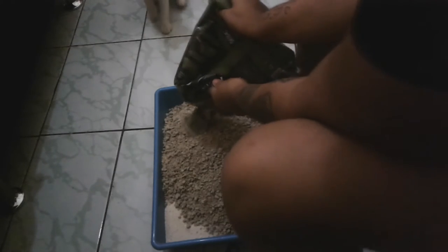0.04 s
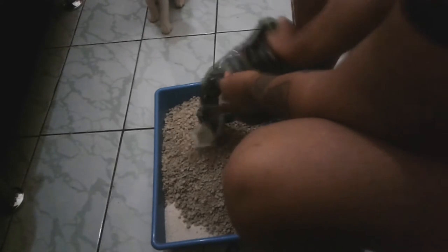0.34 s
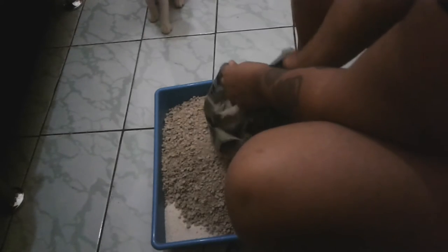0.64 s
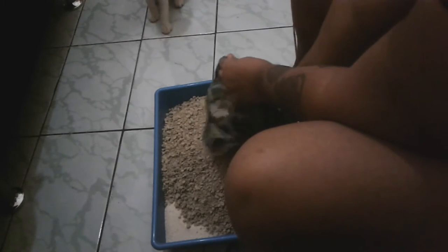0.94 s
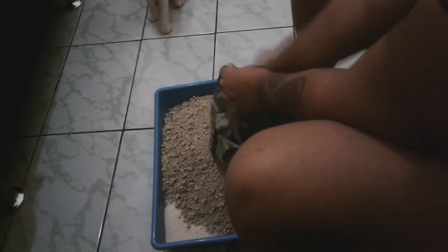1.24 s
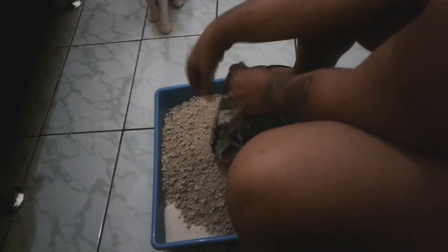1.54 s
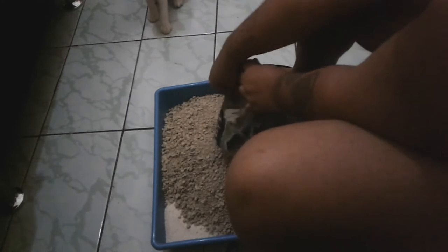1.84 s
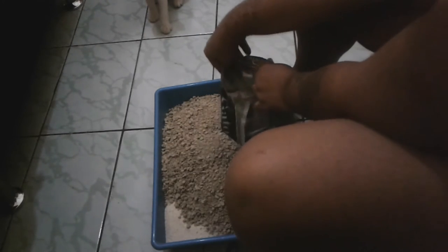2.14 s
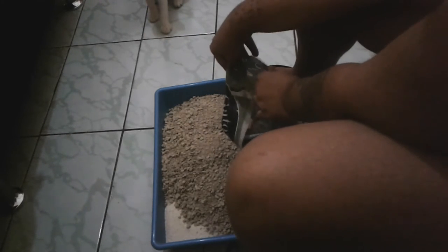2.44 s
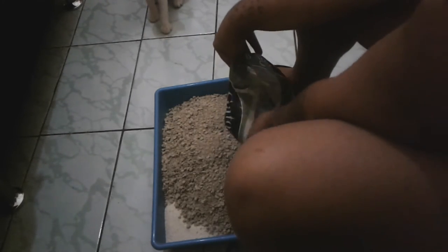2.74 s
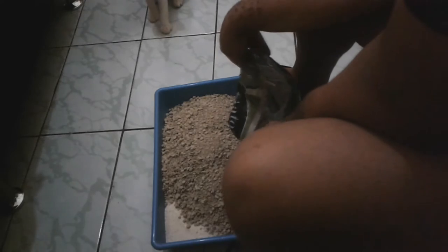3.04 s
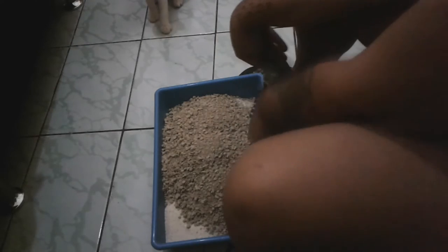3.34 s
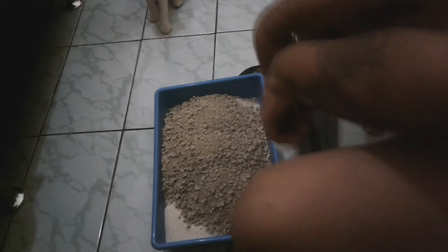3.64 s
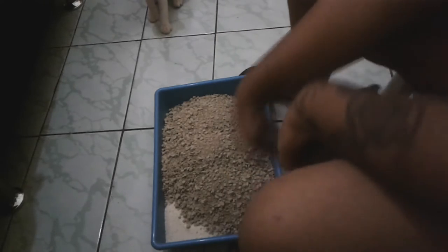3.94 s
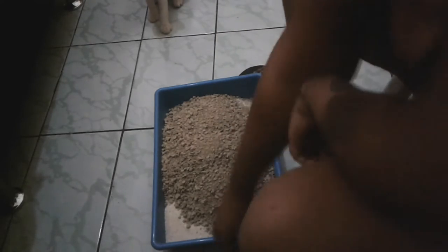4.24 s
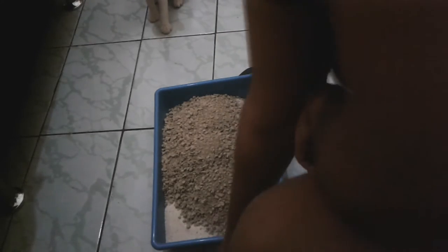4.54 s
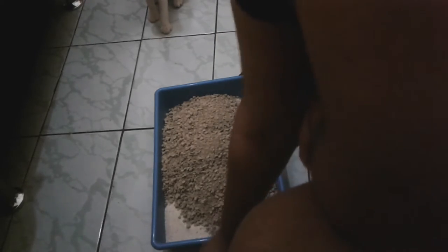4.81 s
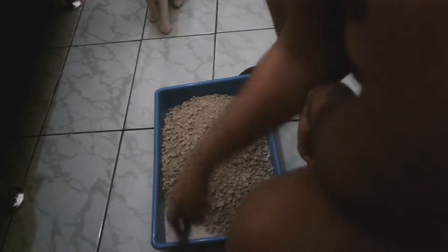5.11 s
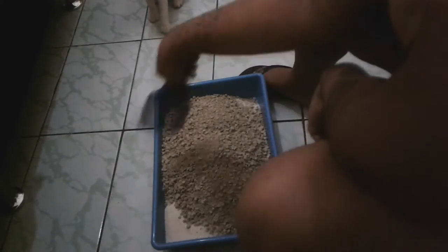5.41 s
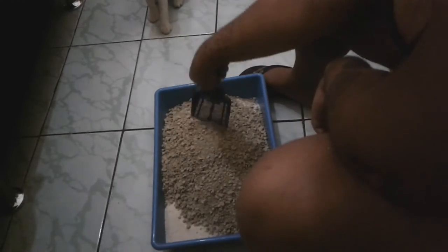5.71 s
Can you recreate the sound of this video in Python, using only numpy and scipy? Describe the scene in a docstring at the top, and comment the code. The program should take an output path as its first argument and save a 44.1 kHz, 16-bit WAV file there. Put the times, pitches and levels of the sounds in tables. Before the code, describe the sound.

Cat litter patters into a plastic tray as a crackling plastic bag is shaken empty, then a plastic scoop knocks and scrapes.

```python
"""A plastic bag is crumpled and shaken empty over a tray of cat litter in a small tiled room.
From the start a fan hums faintly and granules slide and patter onto the heap in countless impacts.
From 0.2 s to about 4 s the film rustles by friction and snaps as its folds buckle; the tray bumps softly.
The flow dies away, and from 4.8 s a plastic scoop is picked up, knocking and scraping over grit.
The tiles reverberate after every snap and knock."""
import sys
import numpy as np
from scipy import signal
from scipy.fft import rfft, irfft
from scipy.io import wavfile

SR = 44100
rng = np.random.default_rng(int(sys.argv[2]) if len(sys.argv) > 2 else 0)


def waveform_to_disk(signal):
    """Save audio, clipped to [-1, 1], as 16-bit WAV at the path in sys.argv[1]."""
    frames = np.transpose(np.atleast_2d(signal))
    scaled = np.clip(frames, -1, 1) * 32767
    samples = np.round(scaled).astype(np.int16)
    wavfile.write(sys.argv[1], SR, samples)


N = 258867
TIME = np.arange(N) / SR

# granules sliding out of the bag until it is empty: (time [s], flow level [dB])
LITTER_FLOW = [(0, -47.5), (.58, -44.5), (.74, -46), (.86, -40.5), (1.0, -44.5), (1.27, -49), (1.36, -46.5),
               (1.48, -43.5), (1.76, -61.5), (2.22, -46.5), (2.45, -52), (2.63, -53), (2.77, -61),
               (3.14, -61), (3.48, -38.5), (3.59, -44), (4.26, -49), (4.39, -60), (4.58, -60.5), (4.7, -62)]
EMPTY_S = LITTER_FLOW[-1][0]


def undb(db):
    """Amplitude ratio: a factor of ten for every 20 dB."""
    return 10 ** (np.asarray(db) / 20)


def unit(x):
    """Normalisation to an rms of 1."""
    return x / np.sqrt(np.mean(x ** 2))


def add(track, s, x):
    """Superposition of a short sound on a track at time s."""
    i = int(s * SR)
    track[i:i + len(x)] += x[:N - i]


def colour(x, spectrum):
    """Minimum-phase filtering to the given spectral shape; rms 1."""
    hz, db = np.transpose(spectrum)
    size = 2048
    f = np.maximum(np.fft.rfftfreq(size, 1 / SR), 1)
    magnitude = undb(np.interp(np.log(f), np.log(hz), db))
    cepstrum = irfft(np.log(magnitude))
    cepstrum[1:size // 2] *= 2  # folding the cepstrum makes the filter causal
    cepstrum[size // 2 + 1:] = 0
    response = irfft(np.exp(rfft(cepstrum)))
    return unit(signal.fftconvolve(x, response)[:len(x)])


def ring(x, hz, width_hz):
    """Resonance of one damped mode: the narrower the band, the longer it rings."""
    return signal.lfilter(*signal.iirpeak(hz, hz / min(width_hz, SR / 4), fs=SR), x)


def walk(rate):
    """Random modulation: rate Gaussian values a second, joined by straight lines."""
    knots = rng.standard_normal(1024)
    return np.interp(TIME * rate, np.arange(len(knots)), knots)


def grains(rate, spread_db):
    """Shot noise: independent impacts of random size, on average rate a second."""
    hit = rng.random(N) < rate / SR
    size = undb(spread_db * np.minimum(rng.exponential(size=N), 4.5))
    return hit * size * rng.choice([-1, 1], N)


def shower(rate, spread_db, wash_db):
    """Dense impacts over Gaussian noise, which stands for the diffuse field of their echoes; rms 1."""
    return unit(unit(grains(rate, spread_db)) + undb(wash_db) * rng.standard_normal(N))


def slips(ms, decay):
    """Stick-slip friction as a dying burst of whitened noise; energy 1."""
    t_ms = np.arange(SR // 20) * 1000 / SR
    fade = np.exp(-t_ms / (decay * max(ms, .2)))
    phase = np.angle(rfft(rng.standard_normal(len(t_ms)) * fade))
    burst = irfft(np.exp(1j * phase), len(t_ms)) * np.sqrt(fade)
    return burst / np.linalg.norm(burst)


def click(crisp_db, body_db, ms, modes, decay, thud_db):
    """Impulsive excitation of plastic: a crisp top, the ring of its modes and a faint dull thud."""
    # spectrum of the crisp top: (frequency [Hz], relative level [dB])
    crack_spectrum = [(1500, -20), (4000, -21), (6000, -9), (7600, -5.5), (8600, -1.5), (9500, 5),
                      (10400, -1.5), (11200, -6.5), (12300, -13)]
    push = slips(ms, decay)
    top = colour(slips(ms, decay), crack_spectrum)
    body = sum(undb(db) * ring(ring(push, hz, width_hz), hz, 3 * width_hz) for hz, width_hz, db in modes)
    thud = ring(ring(slips(ms, decay), 450, 1400), 450, 1400)
    parts = ((top, crisp_db), (body, body_db), (thud, body_db + thud_db))
    # each part has the energy of 1 ms of sound at its level
    return sum(part / np.linalg.norm(part) * undb(db) for part, db in parts) * np.sqrt(SR / 1000)


def strokes(table, attack_s, fade_db_per_s):
    """Envelope of hand strokes: each rises, holds and decays exponentially; their powers add."""
    power = np.zeros(N)
    for s, hold_s, db in table:
        attack = np.clip((TIME - s) / attack_s + .5, 0, 1)
        fade_db = fade_db_per_s * np.maximum(TIME - s - hold_s, 0)
        power += (attack * undb(db - fade_db)) ** 2
    return np.sqrt(power)


def motions():
    """Excitation envelopes of the flowing litter, the crumpling hands and the scraping scoop."""
    # hands crumpling the bag: (time [s], hold [s], level [dB])
    crumples = [(0.225, 0.2, -43.5), (0.465, 0.014, -38.5), (0.497, 0.065, -39.5), (0.772, 0.07, -37),
                (1.11, 0.018, -45.5), (2.058, 0.046, -40), (2.2, 0.017, -38.5), (2.812, .03, -49.5),
                (3.17, 0.024, -44), (3.295, 0.024, -43.5), (3.405, 0.071, -38.5), (3.61, 0.04, -39.5),
                (3.70, 0.0081, -56), (3.905, 0.091, -42.5)]
    # the scoop scraping over grit: (time [s], hold [s], level [dB])
    scrapes = [(4.955, 0.02, -52), (5.135, 0.08, -54.5), (5.3, 0.088, -59.5), (5.384, 0.019, -50.5),
               (5.51, 0.019, -60), (5.803, 0.089, -54)]
    flow_db = np.interp(TIME, *np.transpose(LITTER_FLOW))
    fade_db = 9.5 * np.maximum(TIME - EMPTY_S, 0)
    return np.array([undb(flow_db - fade_db),
                     strokes(crumples, attack_s=0.014, fade_db_per_s=88),
                     strokes(scrapes, attack_s=0.021, fade_db_per_s=84)])


def driven(motion, flow_db, crumple_db, scrape_db):
    """Incoherent addition: the level in dB of the three motions' weighted powers."""
    return 10 * np.log10(undb([flow_db, crumple_db, scrape_db]) ** 2 @ motion ** 2 + 1e-12)


def tiles(x, wet_db, t60_low=0.24, t60_high=0.37, build_s=0.022, near_db=-4):
    """Reverberation: weak early reflections from floor and tray, then the dense return from the walls."""
    t = np.arange(SR * 2 // 3) / SR
    echoes = rng.standard_normal(len(t)) * undb(6.4 * rng.standard_normal(len(t)))
    low = signal.sosfilt(signal.butter(1, 4000, fs=SR, output="sos"), echoes)
    tail = low * undb(-60 * t / t60_low) + (echoes - low) * undb(-60 * t / t60_high)
    tail *= np.where(t < build_s, undb(near_db), 1)
    return x + undb(wet_db) * signal.fftconvolve(x, tail / np.linalg.norm(tail))[:N]


def fan():
    """Broadband flow noise with a few tones that waver in amplitude and phase."""
    # rush of air: (frequency [Hz], relative level [dB])
    air_spectrum = [(30, -51), (75, -45), (108, -12), (138, -21), (175, -3), (230, 1.5), (330, -2),
                    (600, -5), (1000, -7), (1800, -9.5), (3000, -23.5), (6500, -26), (9400, -24),
                    (12000, -50)]
    # tones of the fan: (frequency [Hz], relative level [dB])
    hum = [(226.6, -67), (306.8, -70.5), (360.7, -66), (597.5, -69)]
    air = colour(rng.standard_normal(N), air_spectrum) * undb(-57.0 + 1.9 * walk(7.2))
    tones = np.zeros(N)
    for hz, db in hum:
        gain = undb(db - 0.5 + 2 * walk(11.0))
        tones += gain * np.sin(2 * np.pi * hz * TIME + 1.2 * walk(9))
    return air + np.sqrt(2) * tones


def tray(decay_s=0.017):
    """Heavily damped vibration: the tray answers each nudge with a soft, low bump."""
    # nudges against the tray: (time [s], level [dB])
    bumps = [(0.22, -60), (0.495, -64), (0.882, -64), (1.102, -60), (2.322, -62), (2.808, -63),
             (3.535, -51), (3.59, -64), (4.78, -65), (4.97, -62)]
    # spectrum of a bump: (frequency [Hz], relative level [dB])
    bump_spectrum = [(25, 6), (70, -5), (115, -9), (200, -18), (500, -33)]
    gain = np.zeros(N)
    for s, db in bumps:
        age = np.maximum(TIME - s, 0) / decay_s
        gain += undb(db) * age * np.exp(1 - age)
    return colour(rng.standard_normal(N), bump_spectrum) * gain


def scoop():
    """Modal ringing as the scoop taps floor and tray; a soft contact barely excites the high modes."""
    # contacts: (time [s], crisp level [dB], body level [dB], nominal length [ms], cut-off [Hz])
    knocks = [(4.7684, -41.5, -30, 0.44, 4000), (4.7743, -50, -38.5, 2.5, 3600),
              (4.892, -49.5, -40, 0.81, 3500), (4.898, -50, -41.5, 8.5, 2100), (4.936, -62, -52, .7, 2500),
              (4.954, -43, -44, 1.9, 5000), (5.139, -45, -47, 3.2, 6000), (5.374, -48, -49, 1.1, 1500),
              (5.384, -48, -36, 1.2, 9000), (5.387, -49, -44, .8, 9000), (5.5114, -43, -43.5, 5.2, 5000),
              (5.7958, -49, -46, 0.87, 8000), (5.815, -50, -45, 0.76, 7000)]
    # modes of the scoop: (frequency [Hz], bandwidth [Hz], relative level [dB])
    scoop_modes = [(1550, 460, -3), (1950, 360, 2.5), (2580, 490, 4), (3030, 530, 3.5), (4460, 340, 5),
                   (6200, 1400, 3), (7660, 1000, -13)]
    taps = np.zeros(N)
    for s, crisp_db, body_db, ms, contact_hz in knocks:
        modes = [(hz, width_hz, db - 10 * np.log10(1 + (hz / contact_hz) ** 4))
                 for hz, width_hz, db in scoop_modes]
        add(taps, s, click(crisp_db, body_db, ms, modes, decay=2.8, thud_db=-11))
    return tiles(taps, wet_db=-0.5)


def slides():
    """Short runs of granules, each exciting one resonance under a Gaussian envelope."""
    # runs: (peak time [s], time spread [s], frequency [Hz], bandwidth [Hz], level [dB])
    runs = [(1.46, 0.075, 905, 300, -44.5), (3.3, 0.11, 1680, 900, -52), (3.486, 0.042, 1290, 280, -42.5),
            (3.5, 0.048, 446, 300, -45.5), (3.8, 0.023, 760, 350, -47), (3.92, 0.034, 520, 350, -48.5),
            (3.93, 0.025, 1620, 700, -48.5), (4.05, 0.11, 480, 342, -58.5),
            (4.21, 0.087, 2220, 1370, -47.5), (4.935, 0.049, 1280, 2170, -55.5),
            (5.185, 0.027, 1510, 700, -52.5)]
    sound = np.zeros(N)
    for s, spread_s, hz, width_hz, db in runs:
        impacts = grains(rate=4400, spread_db=-0.5)
        run = ring(ring(impacts, hz, width_hz), hz, 2 * width_hz)
        sound += unit(run) * undb(db) * np.exp(-.5 * ((TIME - s) / spread_s) ** 2)
    return sound


def litter(motion):
    """Impact noise: granules land dully on the heap, rattle on plastic and crunch when squeezed."""
    # landing on the heap: (frequency [Hz], relative level [dB])
    heap_spectrum = [(60, -31), (115, -40), (175, -8.5), (260, -5.5), (450, -3.5), (700, -3), (1000, 0),
                     (1400, -1.5), (1900, -6), (2600, -10.5), (4500, -31.5)]
    # striking the plastic: (frequency [Hz], relative level [dB])
    rattle_spectrum = [(200, -56), (900, -10.5), (1600, 2.5), (2200, 2), (3000, 2.5), (4200, -1.5),
                       (6000, -5.5), (9000, -15.5)]
    # squeezed granules: (frequency [Hz], relative level [dB])
    crunch_spectrum = [(300, -51), (1300, -12), (2300, -1), (3300, -12), (4600, -4.5), (9000, -19)]
    patter = colour(shower(rate=2000, spread_db=2.5, wash_db=2.0), heap_spectrum)
    patter *= undb(driven(motion, flow_db=0, crumple_db=-16, scrape_db=-4) + 2.12 * walk(40))
    rattle = colour(shower(rate=900, spread_db=0.0, wash_db=6.0), rattle_spectrum)
    rattle *= undb(driven(motion, flow_db=-1.65, crumple_db=-4, scrape_db=-1) + 0.88 * walk(50))
    crunch = colour(grains(rate=380, spread_db=4.0), crunch_spectrum)
    crunch *= undb(driven(motion, flow_db=-7, crumple_db=-10, scrape_db=-17))
    return patter + rattle + crunch + slides()


def small_folds(rustle_db, per_s=16, scatter_db=3, scatter_octaves=0.6, count=200):
    """Random buckling until the bag is empty, its level following the rustle; rows as in loud_folds."""
    times = np.cumsum(rng.uniform(0, 2, count)) / per_s
    folds = []
    for s, (top, body, pitch) in zip(times, rng.standard_normal((count, 3))):
        if s < EMPTY_S:
            db = np.interp(s, TIME, rustle_db) - 5
            hz = min(3270 * 2 ** (scatter_octaves * pitch), SR / 6)
            folds.append((s, db + scatter_db * top, db + 1 + scatter_db * body, hz, 0.45))
    return folds


def bag(motion):
    """Friction of film on film makes a dense hiss; buckling makes sparse crinkles and loud snaps."""
    # rustle of the film: (frequency [Hz], relative level [dB])
    film_spectrum = [(1500, -32.5), (3000, -18.5), (5000, -12), (7200, -8.5), (8400, -5.5), (9400, -0.5),
                     (10400, -4), (11200, -11.5), (12300, -28)]
    # snaps: (time [s], relative crisp level [dB], relative body level [dB], mode [Hz], nominal length [ms])
    loud_folds = [(0.2275, -24, -34, 5200, 0.44), (0.2675, -31, -32, 4350, 0.49),
                  (0.3009, -29, -26.5, 3080, 0.4), (0.3472, -41, -27, 4050, 0.19),
                  (0.3623, -35, -32, 4420, .4), (0.366, -40, -38, 4600, .3), (0.3885, -37, -40, 6000, .25),
                  (0.419, -33, -36, 3780, 0.27), (0.499, -44, -36, 2000, 0.47),
                  (0.501, -42, -26, 3500, 1.3), (0.512, -31, -37, 4500, 0.65), (0.529, -26, -33, 5700, 2.8),
                  (0.5658, -36, -38, 4300, .5), (0.601, -33, -46, 2000, 0.46), (0.7183, -28, -28, 4420, 18),
                  (0.765, -25.5, -41, 4500, 0.8), (0.7735, -33, -29, 3820, 0.82),
                  (0.7811, -26.5, -29.5, 2500, 1.6), (0.8, -25, -37, 2900, 3),
                  (0.827, -34, -28, 3320, 0.74), (0.8308, -27, -38, 2400, 0.71),
                  (0.8895, -21.5, -29, 3630, 2), (0.989, -30, -41, 4800, .4), (1.043, -41, -44, 4500, .4),
                  (1.1096, -29, -42, 5800, 0.48), (1.122, -42, -36, 5500, .4),
                  (1.4526, -32.5, -31.5, 2950, 0.66), (1.6786, -49, -43, 1900, 0.46),
                  (1.8832, -38.5, -39, 6400, 1.3), (2.0233, -40, -49, 4500, 0.49),
                  (2.0603, -22.5, -27.5, 1880, 0.17), (2.0874, -26, -32, 5560, 0.17),
                  (2.136, -42, -31, 5100, 0.3), (2.161, -23, -31, 4040, 0.18),
                  (2.2016, -34, -24.5, 3000, 0.43), (2.204, -24.5, -30, 4600, 0.7),
                  (2.2392, -37, -34, 3800, 1.4), (2.3278, -28, -46, 1810, 0.78),
                  (2.3827, -36.5, -43, 5370, 0.36), (2.5903, -49, -40, 2900, 0.43),
                  (2.812, -23, -28.5, 3340, 0.39), (2.934, -60, -42.5, 3450, .6),
                  (2.9635, -44, -58, 6000, 0.3), (2.9914, -49, -48, 4570, .3), (3.0948, -57, -46, 2720, .4),
                  (3.171, -22.5, -37.5, 2700, 0.31), (3.1915, -35, -43, 2400, 0.34),
                  (3.2205, -45, -38.5, 4600, 0.54), (3.2966, -29, -36, 2500, 0.76),
                  (3.298, -43, -42, 6040, .4), (3.3826, -32, -46, 5000, .4), (3.391, -27, -30, 4440, 1.4),
                  (3.413, -28, -36, 3800, 2.2), (3.445, -21.5, -45, 3000, 0.74),
                  (3.608, -19, -18, 5400, 0.68), (3.6101, -17.5, -26, 5850, 0.87),
                  (3.6112, -24, -30, 5300, 0.56), (3.631, -26, -49, 5000, 1.5), (3.639, -36, -45, 5500, .9),
                  (3.662, -40, -27, 3530, 0.52), (3.6962, -18.5, -31, 3600, 2), (3.714, -27, -37, 2000, .8),
                  (3.717, -24, -38, 2000, 1.7), (3.7277, -30, -47, 5000, .5), (3.9687, -27, -44, 5500, 1.5),
                  (4.0332, -36, -49, 5000, .4)]
    rustle_db = driven(motion, flow_db=-1, crumple_db=-0.5, scrape_db=-0.5)
    hiss = colour(shower(rate=1500, spread_db=0.5, wash_db=3.0), film_spectrum)
    hiss *= undb(rustle_db - 0.03 + 0.31 * walk(51))
    crinkles = colour(grains(rate=300, spread_db=16.0), film_spectrum) * undb(rustle_db - 12)
    snaps = np.zeros(N)
    for s, crisp_db, body_db, hz, ms in loud_folds + small_folds(rustle_db):
        panel = [(hz, 0.37 * hz, 0), (hz, 2 * hz, -13)]  # each fold rings a panel of its own size
        add(snaps, s, click(crisp_db + 0.95, body_db + 0.14, ms, panel, decay=3.46, thud_db=-18))
    return hiss + crinkles + tiles(snaps, wet_db=-2.5)


def scene():
    """Superposition of all sources in one channel."""
    motion = motions()
    return (fan() + litter(motion) + tray() + scoop() + bag(motion))[None]


def record(dry):
    """Band limiting: a steep low-pass removes the treble above 12 kHz."""
    return signal.sosfilt(signal.ellip(10, .2, 80, 12000, fs=SR, output="sos"), dry)


dry = scene()
out = record(dry)
waveform_to_disk(out)
```